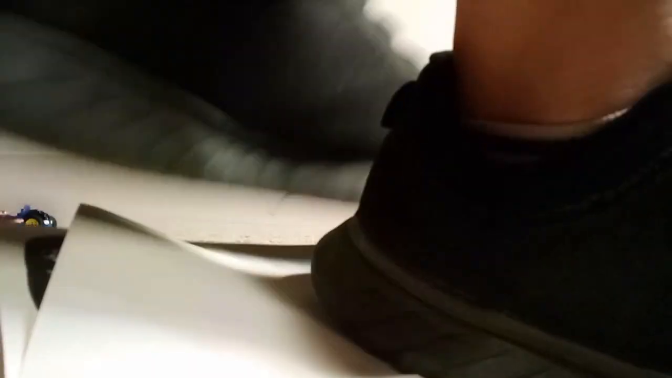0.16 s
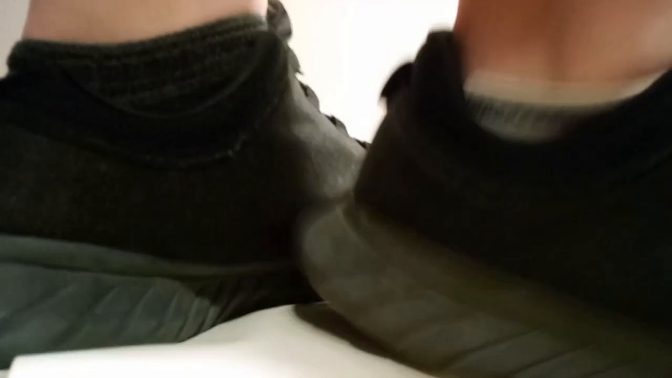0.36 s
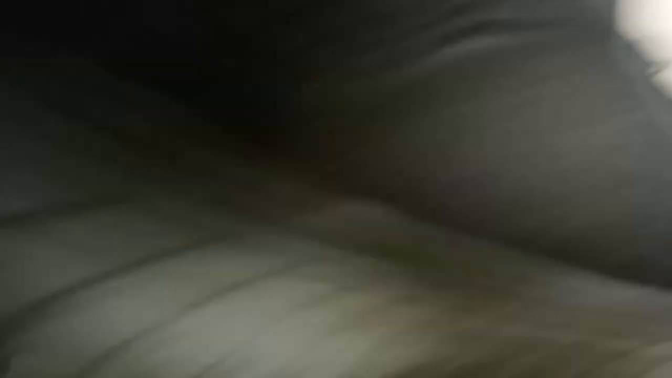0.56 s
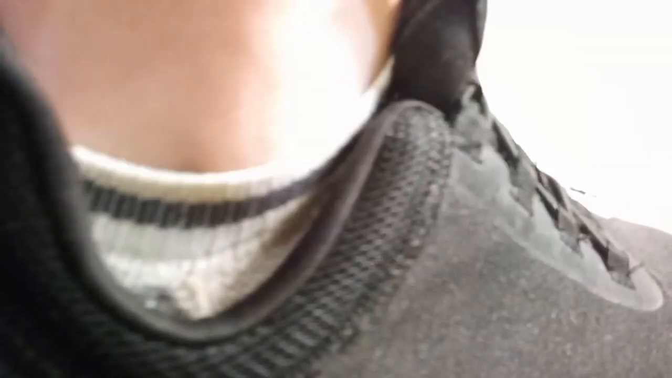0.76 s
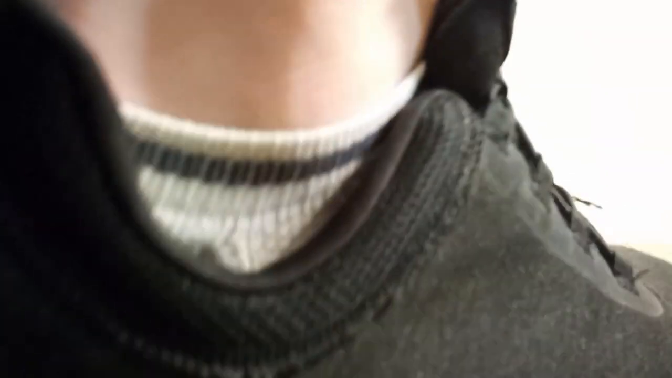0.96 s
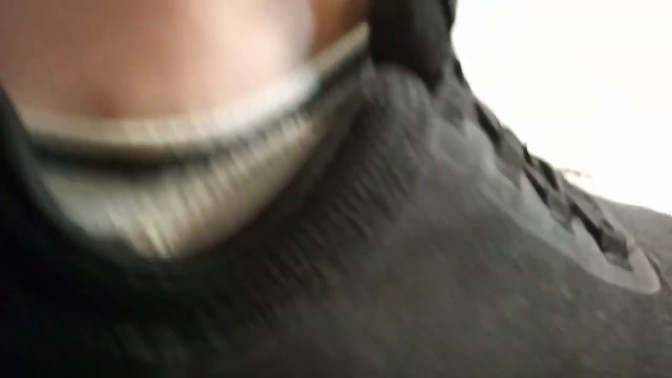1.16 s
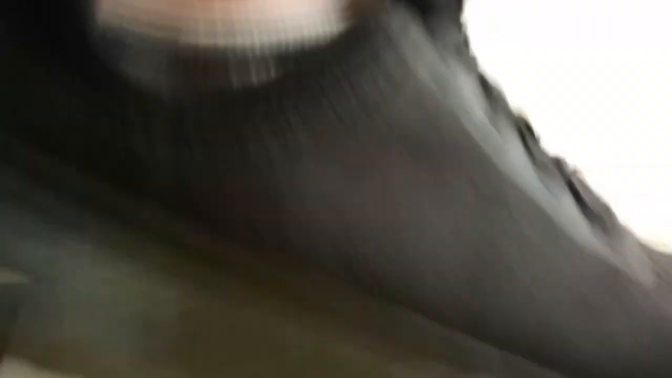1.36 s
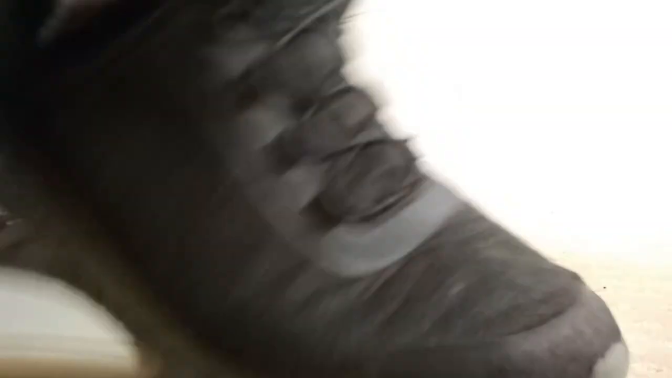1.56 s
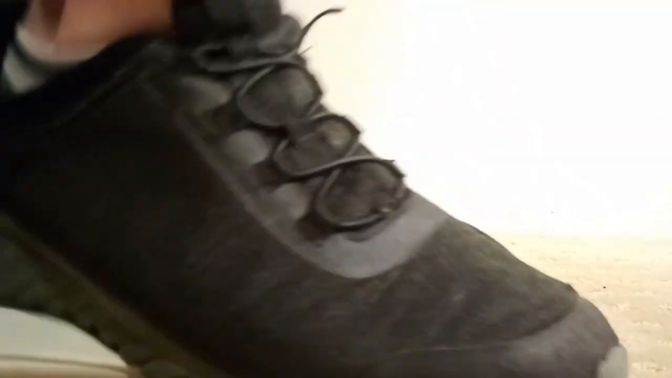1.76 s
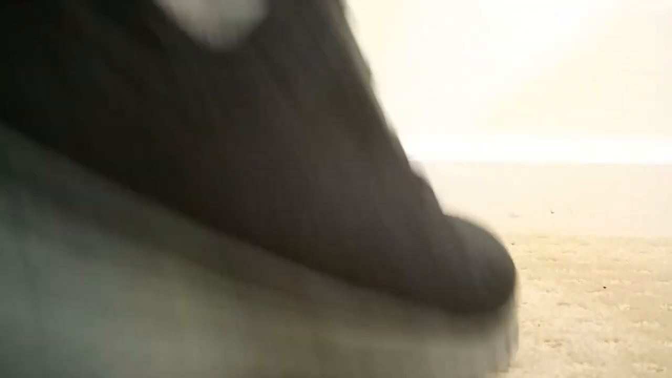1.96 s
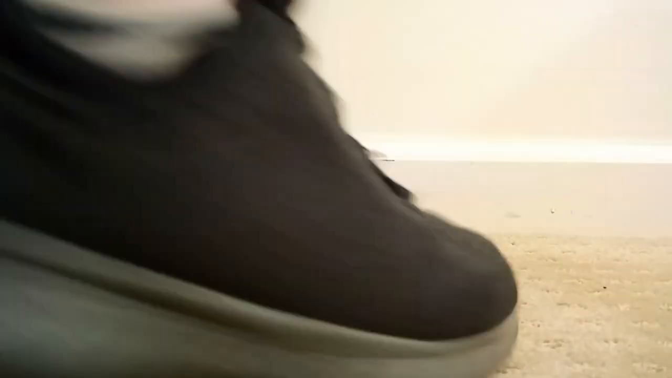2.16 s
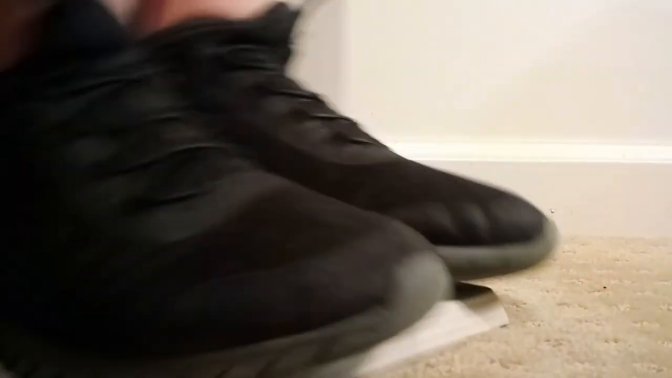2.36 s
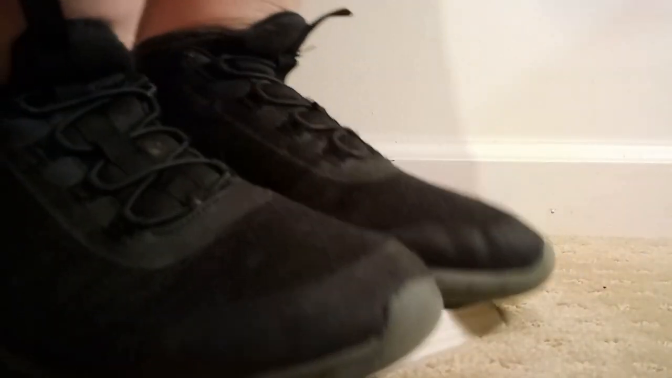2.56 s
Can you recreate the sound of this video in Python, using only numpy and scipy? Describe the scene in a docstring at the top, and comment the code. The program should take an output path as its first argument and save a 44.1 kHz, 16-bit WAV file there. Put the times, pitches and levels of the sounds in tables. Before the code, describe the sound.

Paper buckles and snaps under rubber-soled shoes, each step a muffled thud on carpet. The sheets rustle and slide between steps, with a few tiny sole chirps and a last firm stamp, heard close up in a small room.

```python
"""A small, dry room, with a microphone on the floor close to sheets of paper lying on carpet.
Rubber-soled shoes stamp and scuff on the sheets. Each footfall gives a dull thud and buckles the paper
in a cluster of hollow pops with crisp snaps. In between, the sheets slide and rustle, their edges
whisk over each other, and a sole catches with a short chirp. Faint air noise lies underneath."""
import sys
import numpy as np
from scipy import signal
from scipy.fft import rfft, irfft, next_fast_len
from scipy.io import wavfile

SR = 44100
rng = np.random.default_rng(int(sys.argv[2]) if len(sys.argv) > 2 else 0)


def to_wav(sig):
    """Store sig (one row per channel, or 1-D mono) as 16-bit WAV at the path in sys.argv[1].

    Samples outside -1..1 are clipped; the rate is SR.
    """
    pcm = np.clip(np.atleast_2d(sig), -1, 1) * 32767
    pcm = np.round(pcm).astype(np.int16)
    wavfile.write(sys.argv[1], SR, pcm.T)  # frames by channels


N = 116865
T = np.arange(int(.3 * SR)) / SR  # the clock for one short sound [s]


def amp(db):
    """Turns decibels into a number to multiply by."""
    return 10 ** (np.asarray(db) / 20)


def unit(x):
    """Scales a sound to an average strength (rms) of 1."""
    return x / np.sqrt(np.mean(x ** 2) + 1e-20)


def unit_hit(x):
    """Gives a short sound the energy of 5 ms at rms 1."""
    return x / np.sqrt(np.sum(x ** 2) / (.005 * SR) + 1e-20)


def fade(seconds):
    """Dies away by 60 dB in the given time."""
    return np.exp(-np.log(1000) * T / max(seconds, 1e-4))


def add(mix, start, sound):
    """Mixes a sound in at a start time in seconds."""
    part = mix[max(round(start * SR), 0):][:len(sound)]
    part += sound[:len(part)]


def colour(x, points):
    """Shapes the tone along (frequency [Hz], gain [dB]) points, ringing only after each sound."""
    size = next_fast_len(len(x) + 2048)
    hz, db = np.transpose(points)
    log_hz = np.log(abs(np.fft.fftfreq(size, 1 / SR)) + 1)
    log_gain = np.log(amp(np.interp(log_hz, np.log(hz), db)))
    response = np.exp(np.conj(signal.hilbert(log_gain)))
    return np.fft.ifft(np.fft.fft(x, size) * response).real[:len(x)]


def band_noise(hz, octaves):
    """Noise gathered around one pitch."""
    away = np.log2((np.fft.rfftfreq(len(T), 1 / SR) + 1) / hz) / octaves
    return irfft(rfft(rng.standard_normal(len(T))) * np.exp(-away ** 2 / 2), len(T))


def flicker(size, step_s):
    """A random wobble that glides to a new value at every step."""
    return unit(np.interp(np.arange(size) / SR, np.arange(size) * step_s, rng.standard_normal(size)))


def clicks(size, per_s):
    """Scattered clicks of random strength."""
    return unit(rng.standard_normal(size) * (rng.random(size) < per_s / SR))


# tone of the background air: (frequency [Hz], gain [dB])
AIR_TONE = [(25, -18), (90, 12.5), (250, 2.5), (700, 5), (1800, -10), (4000, -2.5), (7000, -6),
            (16000, -7.5)]
def air():
    """The faint, steady noise of the air in the room."""
    return amp(-66) * unit(colour(rng.standard_normal(N), AIR_TONE))


def room_echo(x):
    """A carpeted room sends back a faint, short echo."""
    tone = [(60, -37.5), (200, 26.5), (700, -7.5), (2000, 6.5), (6000, 14), (16000, -4.5)]
    delay_s = .00713
    tail = colour(rng.standard_normal(len(T)), tone) * fade(seconds=.14) * (T > delay_s)
    return amp(-20) * signal.fftconvolve(x, tail / np.linalg.norm(tail))[:N]


# paper edges sliding: (time [s], length [s], first pitch [Hz], last pitch [Hz], level [dB])
EDGE_SLIDES = [(0.26, 0.064, 3450, 3220, -50.5), (0.324, 0.029, 966, 1660, -41),
               (0.37, 0.05, 2476, 3290, -47.5), (1.675, 0.033, 3320, 5710, -41),
               (1.71, 0.046, 4320, 3470, -40.5)]
def edge_whisks():
    """An edge catches and slips over another sheet: a gritty noise whose pitch follows its speed."""
    out = np.zeros(N)
    for start, length, first_hz, last_hz, db in EDGE_SLIDES:
        progress = T[T < length] / length
        width_hz = .7 * (first_hz + last_hz) / 2
        catches = rng.standard_normal((2, len(T))) * amp(4.5 * flicker(len(T), step_s=.0007))
        fuzz = signal.lfilter(*signal.butter(2, width_hz / 2, fs=SR), catches)[:, :len(progress)]
        phase = 2 * np.pi * np.cumsum(first_hz + (last_hz - first_hz) * progress) / SR
        grit = fuzz[0] * np.cos(phase) + fuzz[1] * np.sin(phase)  # lifts the fuzz to the gliding pitch
        swell = np.sin(np.pi * np.sqrt(progress))
        add(out, start, amp(db) * unit(grit * swell))
    return out


# rubber catching on paper: (time [s], length [s], pitch [Hz], level [dB])
SOLE_CATCHES = [(0.401, 0.012, 1200, -30.5), (0.669, 0.011, 800, -35), (1.35, 0.034, 980, -37.5),
                (1.927, 0.014, 830, -29.5), (2.03, 0.011, 620, -35)]
def sole_chirps():
    """A sole sticks and slips for a moment, at a rough pitch."""
    out = np.zeros(N)
    for start, length, hz, db in SOLE_CATCHES:
        progress = T[T < length] / length
        swell = np.sin(np.pi * progress ** .58)  # peaks early
        add(out, start, amp(db) * unit(band_noise(hz, octaves=.28)[:len(swell)] * swell))
    return out


# tones of the low rub, the hiss and the high sizzle of sliding paper: (frequency [Hz], gain [dB])
RUB_TONE = [(40, -33.5), (120, -13), (250, -9), (420, -2), (650, 1.5), (1100, -3), (1800, -9),
            (3000, -20.5), (8000, -60)]
HISS_TONE = [(600, -55), (1500, -18), (2300, 3), (3500, 5), (5000, 2.5), (6600, 1), (8500, -5),
             (11000, -12.5), (16000, -24)]
SIZZLE_TONE = [(2500, -34), (5000, -43), (6500, -9.5), (9700, 3), (12500, -1.5), (14700, 9), (16000, 7.5)]
# paper strokes: (time [s], rise [s], hold [s], time to drop 30 dB [s], rub [dB], hiss [dB], sizzle [dB])
STROKES = [(0, 0.00074, 0.014, 0.052, -58.5, -67.5, -77), (0.205, 0.024, 0.013, 0.039, -47, -48, -39.5),
           (0.256, 0.0037, 0.011, 0.32, -40.5, -58, -57), (0.304, 0.036, 0.0037, 0.022, -52, -43, -34.5),
           (0.332, 0.066, 0.022, 0.044, -40.5, -43.5, -35), (0.419, 0.016, 0.025, 0.021, -43, -50.5, -45),
           (0.488, 0.0014, 0.06, 0.0063, -39, -39.5, -32), (0.538, .004, 0.0065, 0.089, -33, -43.5, -54),
           (0.622, 0.012, 0.01, 0.088, -32.5, -41.5, -39.5), (0.663, 0.012, 0.015, 0.15, -38.5, -37, -39),
           (0.717, 0.004, 0.026, 0.077, -46.5, -41, -43.5), (0.79, 0.0043, 0.039, 0.74, -56, -64.5, -59.5),
           (0.888, 0.092, 0.036, 0.32, -47, -51, -49.5), (1.053, 0.02, 0.019, 0.06, -47, -48.5, -63),
           (1.138, 0.1, 0.022, 0.052, -39.5, -50, -48), (1.239, 0.0019, 0.0046, 0.13, -41, -39.5, -49),
           (1.335, 0.055, 0.027, 0.1, -38, -44.5, -38.5), (1.419, 0.0038, 0.0098, 0.04, -30, -41.5, -49),
           (1.443, 0.035, 0.034, 0.1, -32, -37.5, -33.5), (1.574, 0.046, 0.0089, 0.084, -39, -50.5, -44),
           (1.69, 0.007, 0.0083, 0.26, -48, -48, -55), (1.757, 0.083, 0.025, 0.058, -40.5, -51, -49),
           (1.839, 0.042, 0.013, 0.092, -29, -36, -27.5), (1.925, 0.02, 0.0071, 0.043, -30.5, -40, -27.5),
           (1.948, 0.0094, 0.062, 0.2, -41, -49.5, -45.5), (2.086, 0.1, 0.0079, 0.024, -37.5, -50, -44),
           (2.159, 0.049, 0.033, 0.2, -34.5, -39, -33.5), (2.234, 0.038, 0.065, 0.1, -36, -43, -40),
           (2.36, .008, 0.04, 0.84, -71, -59.5, -55), (2.53, 0.032, 0.036, 0.68, -52.5, -70, -61),
           (2.602, 0.048, 0.016, 0.052, -43.5, -61, -54)]
def paper_scuffs():
    """Paper rubs on carpet and sole: each grainy stroke swells, holds and dies away."""
    t, power = np.arange(N) / SR, np.zeros((3, N))
    for start, rise, hold, fall, *levels in STROKES:
        swell = np.clip((t - start) / max(rise, .001), 0, 1) ** 1.47
        decay = amp(-30 * np.maximum(t - start - rise - hold, 0) / fall)
        power += (amp(levels)[:, None] * swell * decay) ** 2
    # fibres catch one by one (fast) and in clumps (slower)
    grip = amp(2 * flicker(N, step_s=.00042) + 1.37 * flicker(N, step_s=.0092))
    crackle = amp(-10.5) * clicks(N, per_s=130)  # creases giving way
    out = np.zeros(N)
    for band_power, tone in zip(power, (RUB_TONE, HISS_TONE, SIZZLE_TONE)):
        friction = grip * rng.standard_normal(N) + crackle
        out += np.sqrt(band_power) * unit(colour(friction, tone))
    return out


# tone of crushed carpet: (frequency [times the knock's pitch], gain [dB])
CARPET_TONE = [(.15, -9.5), (.4, -3.5), (1, 7), (1.8, -5), (4, -11), (14, -52)]
# soles landing: (time [s], level [dB], starting pitch [Hz], carpet fade time [s])
LANDINGS = [(0.23, -23, 179, 0.09), (0.265, -28, 197, 0.067), (0.341, -25.5, 214, 0.03),
            (0.353, -40, 126, 0.2), (0.4522, -32.5, 205, 0.058), (0.4912, -29, 203, 0.078),
            (0.549, -28, 292, 0.086), (0.622, -26.5, 241, 0.096), (0.634, -28, 158, 0.02),
            (.728, -40.5, 146, 0.11), (1.251, -38, 244, 0.047), (1.417, -20, 136, 0.075),
            (1.518, -31, 160, 0.068), (1.619, -33, 164, 0.065), (1.829, -34, 296, 0.056),
            (1.897, -32.5, 241, 0.037), (1.944, -34.5, 130, 0.052), (2.025, -43, 100, 0.06),
            (2.185, -34, 140, 0.11), (2.343, -31.5, 173, 0.032), (2.37, -20.5, 259, 0.12),
            (2.387, -30, 342, 0.11), (2.418, -38, 84, 0.34)]
def footfalls():
    """A sole knocks, the carpet is crushed and the floor under it gives a little."""
    sag_octaves_per_s, rise_s = 9.2, .0029  # the pitch sinks as the sole settles into the carpet
    out = np.zeros(N)
    for start, db, hz, fade_s in LANDINGS:
        sinking_hz = hz * 2 ** (-sag_octaves_per_s * T)
        knock = unit_hit(np.sin(2 * np.pi * np.cumsum(sinking_hz) / SR) * fade(fade_s / 2))
        tone = [(multiple * hz, gain) for multiple, gain in CARPET_TONE]
        carpet = unit_hit(colour(rng.standard_normal(len(T)), tone) * fade(fade_s))
        boards = unit_hit(band_noise(hz=103, octaves=.29) * fade(seconds=.34))
        thud = (knock + amp(-7) * carpet + amp(-17.5) * boards) * (1 - np.exp(-T / rise_s))
        add(out, start, amp(db) * unit_hit(thud))
    return signal.sosfilt(signal.butter(4, 58, "high", fs=SR, output="sos"), out)


# air pockets between shoe, sheet and floor: (pitch [Hz], gain [dB])
AIR_POCKETS = [(268, -3.5), (435, -11), (631, -4.5), (987, -21), (1549, -27)]
def pocket_ring(x, width_hz=28.2):
    """Adds the brief ringing of the air under the shoe to a sound."""
    return x + sum(amp(db) * signal.lfilter(*signal.iirpeak(hz, hz / width_hz, fs=SR), x)
                   for hz, db in AIR_POCKETS)


# tone of a paper snap: (frequency [Hz], gain [dB])
SNAP_TONE = [(200, -76), (900, -21), (1800, 2.5), (3500, 1), (6000, -0.5), (11000, -5.5), (16000, -1)]
def paper_snap(db_above_body):
    """A tick, a crack and creases giving way; the weaker the snap is against its pop, the duller."""
    tick = amp(-2.5) * unit_hit(1. * (T == 0))
    crack = unit_hit(rng.standard_normal(len(T)) * fade(seconds=.0035))
    crinkle = amp(5) * unit_hit(clicks(len(T), per_s=2200) * fade(seconds=.011))
    snap = colour(tick + crack + crinkle, SNAP_TONE)
    cutoff_hz = np.clip(32600 * 2 ** (db_above_body / 3.5), 1500, SR / 2 - 2000)
    return unit_hit(signal.lfilter(*signal.butter(2, cutoff_hz, fs=SR), snap))


# paper buckling: (time [s], relative body level [dB], pitch [Hz], relative snap level [dB])
BUCKLES = [(.171, -50.5, 610, -55), (0.2076, -30, 436, -74), (0.2309, -30, 724, -66),
           (0.236, -21.5, 490, -65), (0.2547, -22, 530, -57), (0.2635, -23.5, 1300, -34.5),
           (0.2666, -18, 574, -45), (0.2716, -17.5, 635, -57), (.317, -31, 600, -40.5),
           (.339, -32, 725, -41), (0.412, -24.5, 940, -39.5), (.4545, -24, 567, -39),
           (.462, -26.5, 940, -57), (0.4908, -18.5, 1040, -28.5), (0.4977, -27, 775, -27.5),
           (.506, -19, 920, -45), (0.5398, -22.5, 1240, -31), (0.551, -20, 600, -37.5),
           (0.6014, -28.5, 760, -43), (.6242, -17, 560, -39), (.638, -18.5, 740, -32.5),
           (.647, -35, 597, -36), (0.6759, -23.5, 550, -37), (0.6776, -23, 950, -27.5),
           (0.7259, -23.5, 840, -29), (0.7847, -31.5, 795, -75), (1.047, -35, 593, -42.5),
           (1.076, -31, 790, -33.5), (1.14, -41.5, 670, -57), (1.165, -34, 894, -49), (1.2, -39, 990, -49),
           (1.2442, -24, 615, -31), (1.251, -27.5, 670, -49), (1.298, -35.5, 780, -47),
           (1.3994, -31, 970, -35.5), (1.4228, -28, 1300, -34.5), (1.43, -26.5, 780, -44),
           (1.488, -30, 1570, -30), (1.5912, -31, 716, -56), (1.62, -32, 450, -44), (1.63, -26, 514, -37.5),
           (1.668, -33, 960, -33.5), (1.676, -31.5, 1150, -41.5), (1.7037, -28, 715, -28.5),
           (1.79, -33.5, 804, -44), (1.8185, -38, 960, -59), (1.826, -26, 493, -38),
           (1.8355, -30.5, 940, -39.5), (1.877, -27.5, 1240, -35), (1.899, -28, 634, -48),
           (1.981, -26, 780, -39), (1.988, -28, 654, -53), (2.005, -28.5, 744, -53), (2.018, -28, 650, -43),
           (2.051, -37, 696, -64), (2.152, -31.5, 710, -50), (2.1826, -26.5, 603, -27.5),
           (2.3455, -26, 600, -30)]
def paper_pops():
    """The sheet buckles with a snap; a few swings and a brief flapping give the pop its hollow body."""
    swing_cycles, flap_cycles = 4.1, 12.9  # how long each takes to fade
    body_tone = [(40, -32.5), (150, -10.5), (350, -2.5), (1300, 1), (2200, 0), (6000, -32.5)]
    bodies, snaps = np.zeros(N), np.zeros(N)
    for start, body_db, hz, snap_db in BUCKLES:
        swing = unit_hit(np.sin(2 * np.pi * hz * T) * fade(swing_cycles / hz))
        build_up = np.minimum(T * hz / 2, 1)
        flap = unit_hit(band_noise(hz, octaves=.545) * fade(flap_cycles / hz) * build_up)
        add(bodies, start, amp(body_db - .45) * unit_hit(swing + amp(-3) * flap))
        add(snaps, start, amp(snap_db + 1) * paper_snap(snap_db - body_db))
    return pocket_ring(colour(bodies, body_tone)) + snaps


def scene():
    """Feet and paper in the room, over faint air noise; left and right are the same."""
    feet = paper_pops() + footfalls() + paper_scuffs() + edge_whisks() + sole_chirps()
    mono = feet + room_echo(feet) + air()
    return np.array([mono, mono])


# tone of the microphone: (frequency [Hz], gain [dB])
MIC_TONE = [(30, 1), (5000, -1), (6600, 1), (8200, -3), (9800, 2.5), (11500, -3), (13500, -9),
            (15000, -8.5), (16000, -1)]
def record(dry):
    """The microphone's opening rings in the treble, then the very highest sounds are cut off."""
    heard = np.array([colour(channel, MIC_TONE) for channel in dry])
    treble_cut = signal.firwin(801, cutoff=15820, window=("kaiser", 8), fs=SR)
    return signal.oaconvolve(heard, treble_cut[None], "same")


dry = scene()
out = record(dry)
to_wav(out)
```